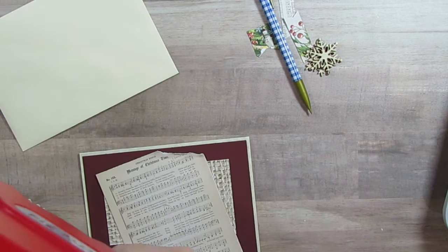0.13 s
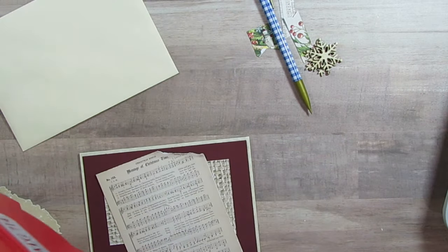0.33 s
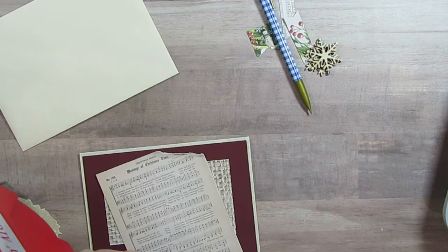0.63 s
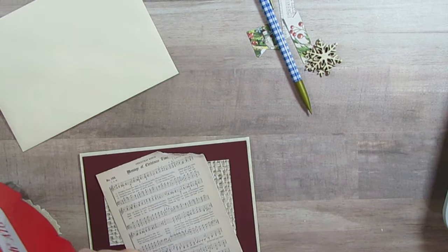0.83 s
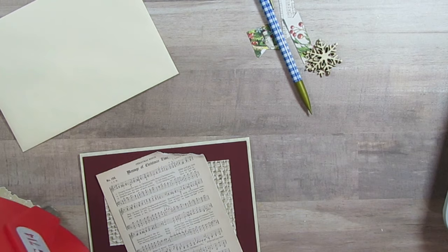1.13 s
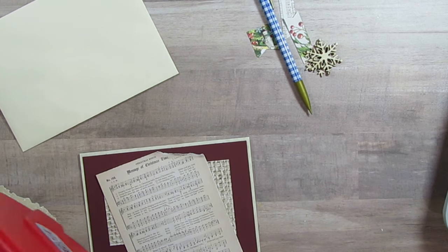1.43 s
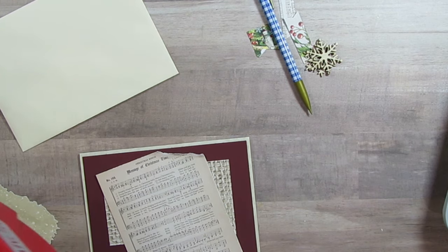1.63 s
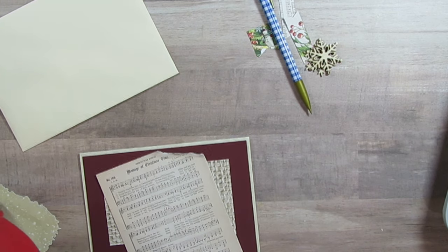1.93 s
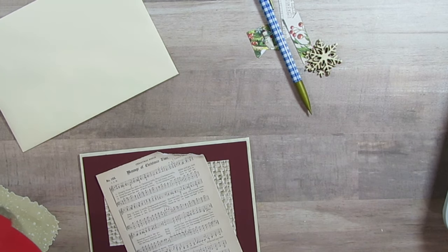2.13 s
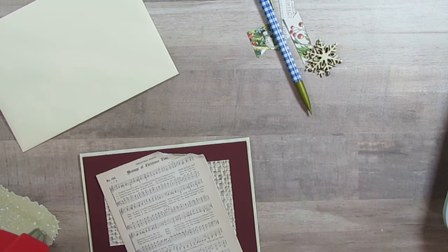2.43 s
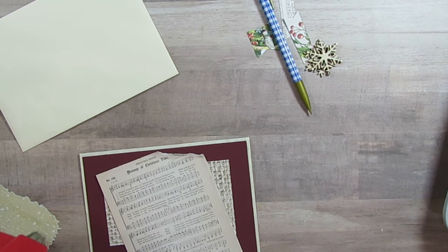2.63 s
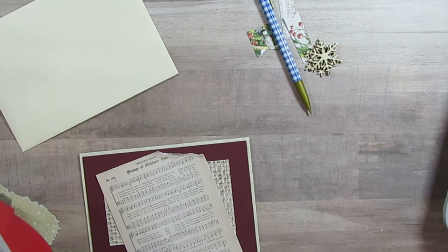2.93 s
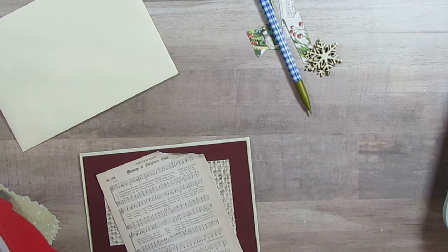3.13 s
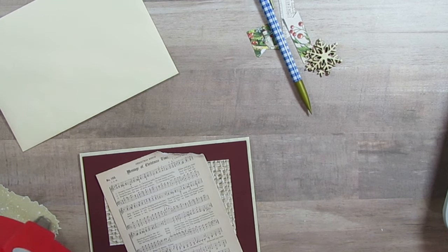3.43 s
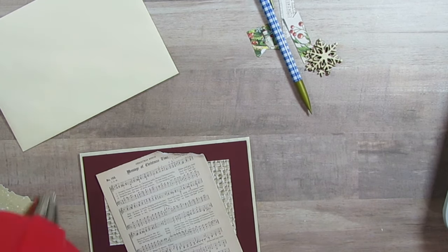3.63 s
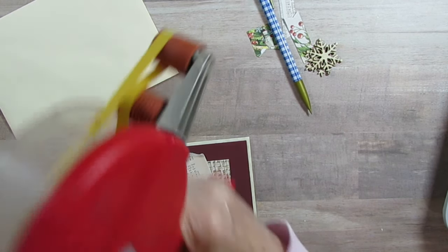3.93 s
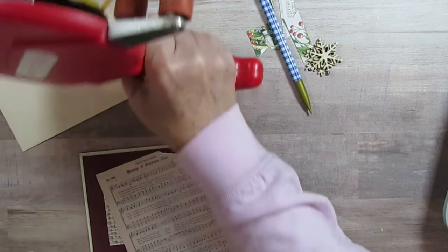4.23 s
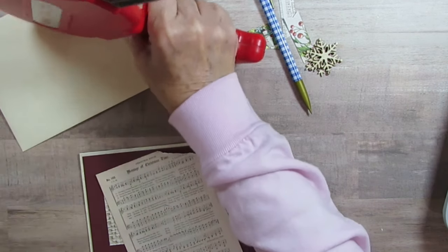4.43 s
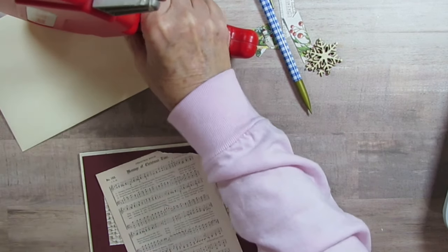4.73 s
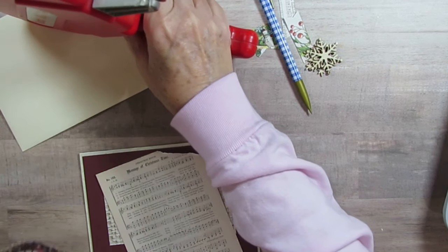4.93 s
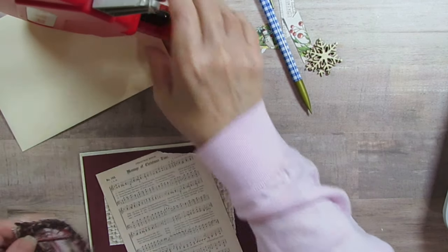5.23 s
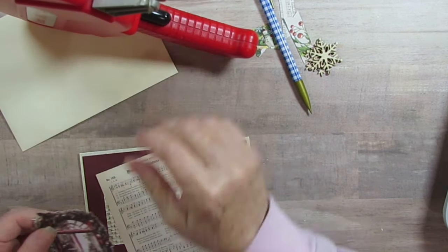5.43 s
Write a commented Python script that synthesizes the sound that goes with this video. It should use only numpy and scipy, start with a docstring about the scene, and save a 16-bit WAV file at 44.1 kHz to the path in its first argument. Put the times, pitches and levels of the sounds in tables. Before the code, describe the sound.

Close hollow plastic clatter and fine tape crackle in repeated bursts over a quiet humming room, ending in a loud set-down and one crisp crack.

```python
"""A plastic tape gun is pressed onto paper on a craft table, rolled along and lifted, three times, then laid down.
Filtered force noise drives its resonant housing, which rattles and ticks; tape and paper crackle as random grains.
Damped low modes of the table top sound at each thump; a three-lobed pulse is the trigger springing back.
Motor harmonics and shaped noise fill the quiet room behind; the recorder turns its gain down after loud peaks."""
import sys
import numpy as np
from scipy import signal
from scipy.fft import rfft, irfft, next_fast_len
from scipy.io import wavfile
from scipy.ndimage import uniform_filter1d, map_coordinates

SR = 44100
rng = np.random.default_rng(int(sys.argv[2]) if len(sys.argv) > 2 else 0)


def transcribe(signal):
    """Save signal, clipped to [-1, 1], as a 16-bit WAV file at the path in sys.argv[1]."""
    frames = np.atleast_2d(signal).T
    limited = np.clip(frames, -1, 1)
    pcm = np.round(limited * 32767).astype(np.int16)
    wavfile.write(sys.argv[1], SR, pcm)


N = 246807


def amp(db):
    """Decibel law: amplitude gain of a level in dB."""
    return 10 ** (np.asarray(db) / 20)


def unit(x):
    """Power normalization: scaled to rms 1."""
    return x / np.sqrt(np.mean(x ** 2) + 1e-20)


def peak(x):
    """Peak normalization: scaled to peak 1."""
    return x / np.max(np.abs(x))


def along(points, hz):
    """Logarithmic interpolation: (frequency [Hz], value) points read on a log axis."""
    f, v = np.transpose(points)
    return np.interp(np.log(hz + 1), np.log(f + 1), v)


def filtered(x, response):
    """Linear filtering: the spectrum of x times a complex response of frequency."""
    m = next_fast_len(x.shape[-1] + 8192)
    spectrum = rfft(x, m) * response(np.fft.rfftfreq(m, 1 / SR))
    return irfft(spectrum, m)[..., :x.shape[-1]]


# Spectrum of the air noise: (frequency [Hz], relative density [dB per Hz])
AIR_SPECTRUM = [(39, -7), (66, -8), (71, -23), (109, -23), (125, -13), (212, -12), (248, -7), (374, -15),
                (540, -11.5), (1050, -21.5), (1150, -22.5), (7130, -33.5), (13200, -39.5), (15500, -63)]
# Interchannel coherence of the air noise: (frequency [Hz], left-right likeness [-1 to 1])
AIR_COHERENCE = [(60, -1), (1650, -0.92), (4970, -0.11), (15000, -0.19)]


def air():
    """Partially coherent noise: room tone and microphone hiss, with a mid-side balance that sets the likeness."""
    def mid_side_gain(f):
        angle = np.arccos(np.clip(along(AIR_COHERENCE, f), -1, 1)) / 2
        return amp(along(AIR_SPECTRUM, f)) * [np.cos(angle), np.sin(angle)]

    mid, side = filtered(rng.standard_normal((2, N)), mid_side_gain)
    return amp(-44.5) * unit(np.array([mid + side, mid - side]))


# Spectrum of the low room rumble: (frequency [Hz], relative density [dB per Hz])
DRONE_SPECTRUM = [(55, -3), (80, 2), (120, 0), (160, 1), (200, -2.5), (280, -3), (400, -28), (600, -60)]


def drone():
    """Fully coherent noise: a soft low rumble, alike on both sides."""
    rumble = filtered(rng.standard_normal(N), lambda f: amp(along(DRONE_SPECTRUM, f)))
    return amp(-54.5) * unit(rumble)


MOTOR_HZ = 49.3
# Harmonics of the motor: (multiple of MOTOR_HZ, rms level before balance and waver [dB], left phase lead [rad])
MOTOR_ORDERS = [(1, -43.5, -0.4), (2, -55, 1.7), (3, -55, -2.5), (5, -60, 1.07), (7, -57, 3.5)]


def hum():
    """Harmonic series of a rotating source: steady motor orders, slightly unsteady in strength."""
    turn = 2 * np.pi * MOTOR_HZ * np.arange(N) / SR
    waver = map_coordinates(rng.standard_normal(40), [np.linspace(0, 39, N)])
    orders = 0
    for multiple, db, lead in MOTOR_ORDERS:
        phase = multiple * turn + np.array([[lead], [-lead]]) / 2
        orders = orders + amp(db) * np.sqrt(2) * np.sin(phase)
    return amp(0.13 * waver + [[-.7], [.7]]) * orders


# Reverberation time of the room: (frequency [Hz], t60 [s])
ROOM_T60 = [(100, 0.38), (700, 0.51), (3000, 0.39), (7000, 0.52), (12000, 0.2)]


def room(x):
    """Statistical reverberation: noise tails in which each frequency decays exponentially at its own speed."""
    out, step = np.zeros((2, N + 3 * SR)), SR // 4
    for start in range(0, N, step):  # a fresh noise tail every quarter second, so no single random colour lasts
        hz, t, z = signal.stft(rng.standard_normal((3, SR)), SR, nperseg=256)
        decay = amp(-60 * t / along(ROOM_T60, hz)[:, None])
        tail = signal.istft(z * decay, SR, nperseg=256)[1]
        tail = tail[:2] + 0.92 * tail[2]  # the third tail is common to both sides
        tail = tail / np.linalg.norm(tail[0])
        wet = signal.fftconvolve(x[None, start:start + step], tail, axes=1)
        out[:, start + 250:][:, :wet.shape[1]] += wet
    return out[:, :N]


# Low modes of the table top: (frequency [Hz], relative level [dB], t60 [s])
TABLE_MODES = [(60.6, 5.5, 0.13), (85, 3.5, 0.086), (131, -5.5, 0.3), (131.5, -1.5, 0.24),
               (206, -7.5, 0.084), (219, -3, 0.048), (331, -6, 0.39)]
# The gun meets the table top: (time [s], push peak [dB], contact time [ms],
# growth of the push per swing [dB], ringing peak over the push peak [dB])
TABLE_BLOWS = [(0.7585, -14.5, 4.2, 2, -1), (1.996, -13.5, 4.3, 2, 0), (3.085, -24.5, 4.85, 0.5, 0.5),
               (3.134, -32, 6.1, -20, 7), (4.5376, -4, 1.09, -18, -4), (4.668, -16.5, 2.8, -5.5, -12)]


def thumps():
    """Modal excitation: a soft push is heard directly and sets the table top's low modes ringing."""
    out, t = np.zeros(N + SR), np.arange(SR // 2) / SR
    modes = sum(amp(db - 60 * t / t60) * np.cos(2 * np.pi * hz * t) for hz, db, t60 in TABLE_MODES)
    for s, db, contact_ms, growth_db, ring_db in TABLE_BLOWS:
        swing = t / (contact_ms / 1000)
        growth = amp(growth_db * np.minimum(swing, 3))
        push = peak(np.where(swing < 3, np.sin(np.pi * swing) * growth, 0))  # the top dents and springs back
        ring = peak(signal.fftconvolve(modes, push)[:len(t)])
        out[round(s * SR):][:len(t)] += amp(db) * (push + amp(ring_db) * ring)
    return out[:N]


def contact(t, t60, noise):
    """Transient contact force: noise with a fast rise and an exponential decay."""
    return (1 - np.exp(-t / (0.072 * t60))) * amp(-60 * t / t60) * noise


# Spectrum of the dry cracks: (frequency [Hz], relative density [dB per Hz])
SNAP_SPECTRUM = [(2060, -23), (3500, -5.5), (4000, -7), (7090, -8), (8100, -11.5), (12300, -9),
                 (16000, -28.5)]
# Dry snaps of tape and plastic edges: (time [s], peak [dB], spectral tilt [dB per octave], force t60 [s])
EDGE_SNAPS = [(0.1334, -25.5, 4, 0.012), (0.3222, -41, 0, .019), (0.7614, -28, -1, 0.019),
              (0.7701, -22.5, -4, 0.014), (0.8264, -30, 2, 0.013), (0.8845, -21, 10, .015),
              (0.9274, -33, 5, 0.026), (1.0074, -33, 3, 0.017), (1.2411, -14.5, -4.5, 0.0083),
              (1.3473, -27, -1, 0.0065), (1.3814, -28, -7, 0.029), (1.8731, -26.5, -3, 0.0079),
              (2.0043, -15.5, 7, 0.015), (2.2124, -31.5, 13, .007), (2.2982, -24, -5.5, 0.016),
              (2.528, -39, 4, 0.018), (2.6494, -35, -4, 0.012), (2.6648, -18.5, -5, 0.0025),
              (2.6844, -26.5, -6.5, 0.013), (3.1074, -33, -7, .017), (3.2414, -32.5, 6, .017),
              (3.2934, -34.5, 10, .03), (3.3388, -36, 2, .025), (3.3962, -33.5, -2, 0.019),
              (3.4735, -39, 6, 0.0093), (3.496, -24.5, -5.5, 0.022), (3.5284, -30, -2, .013),
              (3.5964, -24, -1, .029), (3.7529, -31, -4.5, .015), (3.8871, -34, 11, .01),
              (3.9968, -17.5, -3, 0.013), (4.0532, -38, -5, 0.033), (4.4463, -35, -6, .013),
              (4.4862, -27, -8, 0.0085), (4.5376, -6.5, -4.5, 0.018), (5.1144, -43.5, 3, 0.033),
              (5.2804, -19.5, -1.5, 0.014)]


def snaps():
    """Non-resonant radiation: dry treble cracks without any ring."""
    out, t = np.zeros(N + SR), np.arange(SR // 12) / SR
    for s, db, tilt_db, t60 in EDGE_SNAPS:
        def colour(f):
            return amp(along(SNAP_SPECTRUM, f) + tilt_db * np.log2(f / 8000 + 0.022))

        force = contact(t, t60, rng.standard_normal(len(t)))
        out[round(s * SR):][:len(t)] += amp(db) * peak(filtered(force, colour))
    return out[:N]


# The trigger springs back: (time [s], main lobe peak [dB], centre frequency [Hz])
TRIGGER_RELEASES = [(5.2819, -4, 2020)]


def lobe(t, at, hz):
    """Ricker pulse: one crest between two troughs, centred on a time [s] and a frequency [Hz]."""
    squared = (np.pi * hz * (t - at)) ** 2
    return (1 - 2 * squared) * np.exp(-squared)


def release():
    """Impulsive radiation and reflection: a three-lobed crack, its sharp front and its bounce off the table top."""
    out, t = np.zeros(N), np.arange(-40, 120) / SR
    for s, db, hz in TRIGGER_RELEASES:
        front = -0.19 * lobe(t, -.00022, 3.3 * hz)
        bounce = 0.17 * lobe(t, 0.00056, 0.72 * hz)
        out[round(s * SR) - 40:][:len(t)] += amp(db) * (lobe(t, 0, hz) + front + bounce)
    return out


# Resonances of the plastic shell: (frequency [Hz], undamped width [Hz], relative level [dB])
HOUSING_MODES = [(318.6, 40, 5.5), (458, 156, 2.5), (610, 126, 3.5), (728, 51.6, 7), (842, 161, 1.5),
                 (1273, 322, -1.5), (1404, 155, 1.5), (1773, 244, -5.5), (2358, 150, -3), (2420, 300, -6.5),
                 (3310, 740, -13), (4460, 2000, -22.5), (5720, 320, -18.5)]
MODE_HZ = np.array([hz for hz, _, _ in HOUSING_MODES])
IS_HOLLOW = MODE_HZ < 950  # the low modes sound hollow


def housing(f, weight_db=0, damping=1):
    """Modal superposition: the shell's resonances, each with an extra weight; the plastic passes little treble."""
    weights = np.broadcast_to(weight_db, len(HOUSING_MODES))
    modes = 0
    for k, (hz, width, db) in enumerate(HOUSING_MODES):
        loss = 1j * f * width * damping
        modes = modes + (-1) ** k * amp(db + weights[k]) * loss / (hz * hz - f * f + loss)
    return modes / (1 + 1j * f / 4500 - (f / 4500) ** 2)


SPOT_FOCUS_DB = 14  # fall of the upper modes per squared octave from the spot struck
HOLLOW_FOCUS_DB = 40  # fall of the hollow modes per squared octave from the hollow pitch
TICK_LEFT_DB = -3.5  # left-right level
# Contacts of housing and trigger: (time [s], shell peak before left-right balance [dB],
# hollow knock over the shell [dB], spot struck [Hz], hollow pitch [Hz], force t60 [s])
HOUSING_TICKS = [(0.02, -29.5, -1.5, 1730, 726, 0.034), (0.0578, -25, 2.5, 950, 824, 0.023),
                 (0.0742, -11.5, -10, 1850, 766, 0.014), (0.1141, -16, -4, 912, 760, 0.017),
                 (0.1336, -24.5, -5, 1080, 300, 0.028), (0.1377, -13, -7, 1700, 680, 0.028),
                 (0.1514, -16.5, -7, 1770, 776, 0.026), (0.2423, -25, -2.5, 960, 724, 0.021),
                 (0.321, -26.5, -11, 1230, 736, 0.028), (0.396, -31.5, -13, 1210, 520, 0.02),
                 (0.7614, -16, -4.5, 2950, 460, 0.025), (0.7697, -11.5, -8, 1200, 420, 0.023),
                 (0.8097, -16, -25, 1440, 598, 0.031), (0.8264, -17, -23, 1020, 711, 0.026),
                 (0.9356, -21.5, -15, 1360, 608, 0.056), (0.9598, -19.5, -6, 1730, 614, 0.021),
                 (0.9715, -21, -12, 1330, 313, 0.051), (1.0077, -26, -4, 1240, 587, 0.022),
                 (1.0258, -28, -21, 1780, 608, 0.039), (1.2027, -36, -4, 1470, 575, 0.035),
                 (1.2406, -14.5, -10, 1570, 656, 0.016), (1.3917, -29, -11, 1210, 590, 0.032),
                 (2.0045, -21, -6, 1170, 335, 0.022), (2.0323, -27, 2, 1120, 613, 0.027),
                 (2.1944, -32, 2.5, 1330, 560, 0.023), (2.2874, -33, 4, 1260, 620, 0.012),
                 (2.2977, -19, -21, 1240, 630, 0.021), (2.318, -24, -6, 1750, 517, 0.011),
                 (2.3785, -32.5, 1.5, 1700, 505, 0.024), (2.4157, -19, -8.5, 1730, 670, 0.033),
                 (2.5355, -28.5, -18, 1140, 458, 0.019), (2.5528, -27.5, -18, 1220, 705, 0.023),
                 (3.0896, -27, -4, 970, 300, 0.036), (3.1074, -27, -9, 1240, 620, 0.025),
                 (3.1474, -26.5, -7, 1250, 595, 0.021), (3.1936, -25, -3.5, 1370, 610, 0.02),
                 (3.2271, -24, -5.5, 1800, 554, 0.021), (3.2715, -26.5, -4.5, 1730, 565, 0.018),
                 (3.3385, -27, -17, 1740, 716, 0.033), (3.3961, -22, -12, 1070, 624, 0.029),
                 (3.4733, -25.5, -11, 1400, 324, 0.022), (3.496, -25.5, -22, 1280, 716, 0.035),
                 (3.5285, -19, -13.5, 1530, 357, 0.022), (3.5464, -18, -8, 1220, 748, 0.014),
                 (3.5964, -29, -3, 1220, 426, 0.048), (3.7526, -32, -11, 1250, 770, 0.036),
                 (3.9144, -36, -3.5, 1820, 700, 0.027), (3.9544, -40, 1, 1060, 721, 0.013),
                 (3.9969, -18, -12.5, 3350, 770, 0.023), (4.0532, -34.5, 6, 1250, 750, 0.042),
                 (4.268, -51, 11, 1300, 330, 0.055), (4.362, -53.5, 13.5, 1300, 326, 0.04),
                 (4.405, -52, 10.5, 1300, 330, 0.027), (4.4463, -41, -3, 1470, 560, 0.02),
                 (4.4865, -34.5, -4, 993, 514, 0.011), (4.5376, -6.5, -4.5, 2490, 700, 0.029),
                 (4.6714, -26.5, 11, 902, 810, 0.016), (5.114, -42, -25, 1790, 301, 0.02),
                 (5.2805, -22.5, -12.5, 1540, 510, 0.035)]


def ticks():
    """Point excitation of modes: each contact is a short burst that rings the shell near the spot struck."""
    out, t = np.zeros(N + SR), np.arange(SR // 12) / SR
    for s, db, knock_db, spot_hz, knock_hz, t60 in HOUSING_TICKS:
        force = contact(t, t60, rng.standard_normal(len(t)))
        force[40] = (0.04 / t60) ** 2  # the briefer the contact, the more it is one clean blow
        damping = 1 + 0.012 / t60  # and the more the hand stills the shell
        near_spot = np.where(IS_HOLLOW, -60, -SPOT_FOCUS_DB * np.log2(MODE_HZ / spot_hz) ** 2)
        near_pitch = np.where(IS_HOLLOW, -HOLLOW_FOCUS_DB * np.log2(MODE_HZ / knock_hz) ** 2, -60)
        shell = peak(filtered(force, lambda f: housing(f, near_spot, damping)))
        hollow = peak(filtered(force, lambda f: housing(f, near_pitch)))
        out[round(s * SR):][:len(t)] += amp(db) * (shell + amp(knock_db) * hollow)
    return out[:N] * amp(np.array([[TICK_LEFT_DB], [-TICK_LEFT_DB]]) / 2)


def grains(rate, spread_db, bed):
    """Shot noise: random impulses (rate per second) of very unequal size over a smooth bed of noise."""
    size = amp(spread_db * np.minimum(rng.exponential(size=N), 4))
    hit = (rng.random(N) < rate / SR) * size
    return unit(hit * rng.standard_normal(N)) + bed * rng.standard_normal(N)


def bursts(rows):
    """Exponential growth and decay: power of each burst, climbing and falling steadily in dB."""
    now, powers = np.arange(N) / SR, []
    for s, db, rise, fall, *_ in rows:
        climb = 20 * (now - s) / rise  # 20 dB during the rise
        powers.append(amp(db + np.minimum(climb, fall * (s - now))) ** 2)
    return np.array(powers)


# Levels: the gun in the hand never quite rests; table rumble under the rattle
IDLE_RATTLE_DB, IDLE_CRACKLE_DB, RUMBLE_DB = -52.5, -66.5, -10
# Roller and spool rattle the shell: (time of the height [s], level [dB], rise [s], fall [dB per s],
# hollow pitch [Hz], hollow part over the rest [dB])
RATTLE_BURSTS = [(0.078, -31, 0.051, 320, 750, 1), (0.148, -25, 0.088, 300, 750, 0.5),
                 (0.19, -41, .03, 34, 710, 1.5), (0.78, -30, 0.022, 150, 400, 4.5),
                 (0.8, -26.5, 0.034, 52, 700, -1.5), (0.978, -39, 0.12, 63, 604, 2.5),
                 (1.25, -36.5, 0.013, 134, 700, 3), (2.021, -28.5, .025, 122, 533, 2),
                 (2.2, -36.5, 0.05, 68, 610, 3), (2.292, -36, .02, 66, 585, 0),
                 (2.49, -53, 0.1, 100, 600, -1), (2.536, -41, .015, 88, 600, -0.5),
                 (3.1, -37.5, .02, 51, 610, 4.5), (3.25, -35, 0.14, 19, 610, 0),
                 (3.536, -44, 0.15, 58, 607, 0), (3.812, -50, 0.13, 150, 730, 3),
                 (3.904, -44, .03, 65, 725, 0.5), (4.002, -52, .015, 66, 736, 2.5),
                 (4.3, -56, 0.18, 65, 405, 10.5), (4.51, -46, 0.16, 200, 450, 5),
                 (4.55, -22, .02, 200, 450, 0), (4.569, -22.5, 0.035, 99, 786, 3),
                 (4.69, -40.5, .03, 99, 760, 5), (5.3, -41.5, 0.041, 300, 524, 2),
                 (5.33, -51, .02, 100, 520, -3)]
# Spectrum of tape and paper: (frequency [Hz], relative density [dB per Hz])
CRACKLE_SPECTRUM = [(1470, -23), (2500, -3.5), (4020, -2.5), (4580, -3), (12600, -7.5), (14600, -15),
                    (16000, -59)]
# Tape and paper crackle: (time of the height [s], level [dB], rise [s], fall [dB per s])
CRACKLE_BURSTS = [(0.078, -49.5, .05, 450), (0.148, -52, .1, 200), (0.19, -60, .03, 40),
                  (0.78, -53, .03, 280), (0.978, -52, .1, 58), (1.235, -51.5, 0.013, 70),
                  (1.35, -44.5, 0.018, 140), (1.9, -61, 0.33, 40), (2.02, -54, .04, 87),
                  (2.285, -50, 0.19, 64), (2.418, -56, .02, 300), (2.67, -48, .05, 102),
                  (3.1, -56, .025, 334), (3.26, -49.5, 0.049, 40), (3.385, -51, .3, 170),
                  (3.536, -57, 0.14, 320), (3.586, -40.5, .022, 240), (3.89, -56.5, 0.25, 38),
                  (4.005, -46, 0.022, 22), (4.2, -61, .4, 47), (4.5, -56, 0.31, 200),
                  (4.561, -35.5, .04, 177), (5.27, -48, 0.044, 700), (5.328, -60, .05, 27)]


def stroke():
    """Random vibration: the roller rumbles in the table and rattles the shell, the tape lets go in fine crackles."""
    def table_top(f):
        return sum(amp(db) * 1j * f * 30 / (hz * hz - f * f + 1j * f * 30)
                   for hz, db, _ in TABLE_MODES if hz > 110)

    power = bursts(RATTLE_BURSTS)
    rumble = np.sqrt(power.sum(0)) * unit(filtered(rng.standard_normal(N), table_top))

    force = grains(rate=700, spread_db=3, bed=0.94)
    scale = np.std(filtered(force, housing))
    idle = amp(IDLE_RATTLE_DB) ** 2
    upper = filtered(force, lambda f: housing(f, np.where(IS_HOLLOW, -99, 0)))
    rattle = np.sqrt(power.sum(0) + idle) * upper
    for hz in MODE_HZ[IS_HOLLOW]:  # the grip decides which hollow modes speak
        weight = [amp(db - HOLLOW_FOCUS_DB * np.log2(hz / pitch) ** 2) ** 2
                  for *_, pitch, db in RATTLE_BURSTS]
        mode = filtered(force, lambda f: housing(f, np.where(MODE_HZ == hz, 0, -99)))
        rattle = rattle + np.sqrt(weight @ power + idle) * mode

    tearing = grains(rate=4100, spread_db=6.5, bed=1.3)
    crackle = unit(filtered(tearing, lambda f: amp(along(CRACKLE_SPECTRUM, f))))
    crackle_level = np.sqrt(bursts(CRACKLE_BURSTS).sum(0) + amp(IDLE_CRACKLE_DB) ** 2)
    return amp(RUMBLE_DB) * rumble + rattle / scale + crackle_level * crackle


# Phase between the two microphone ports: (frequency [Hz], left phase lead [rad])
PORT_PHASE = [(3000, 0), (5500, -.25), (7500, -.45), (9500, -.7), (12500, -1.3), (16000, -1.8)]


def scene():
    """Superposition of direct, reflected and reverberant sound; two microphone ports shift the treble in phase."""
    def near_field(f):
        wall = 1 + 0.13 * np.exp(-2j * np.pi * f * 0.0065)  # a near wall, 6.5 ms later
        return wall * np.exp(.5j * np.array([[1], [-1]]) * along(PORT_PHASE, f))

    table = thumps()
    gun = ticks() + snaps() + (release() + stroke()) * amp([[-.6], [.6]])
    close = filtered(gun + table, near_field)
    reverberant = room(amp(-8.5) * gun.mean(0) + amp(-6.0) * table)
    return close + reverberant + hum() + air() + drone()


TOP_HZ = 16478  # nothing passes above
# Narrow dips in the response: (centre [Hz], width [Hz], depth [0-1])
RESPONSE_DIPS = [(3900, 130, .85), (7860, 90, .9)]


def record(dry):
    """Gain control and band limiting: gain sinks after loud peaks and creeps back; the response has narrow dips."""
    over_db = np.maximum(20 * np.log10(np.abs(dry).max(0) + 1e-9) + 4, 0)  # above -4 dB
    slope = 14 * np.arange(N) / SR  # recovery, 14 dB per s
    held_db = np.maximum.accumulate(np.minimum(over_db, 6) + slope)
    cut_db = np.maximum(held_db - slope, 0)
    cut_db = uniform_filter1d(np.pad(cut_db, (440, 0))[:N], size=880)

    def response(f):
        dips = np.prod([1 - depth * np.exp(-((f - hz) / width) ** 2)
                        for hz, width, depth in RESPONSE_DIPS], axis=0)
        low_cut = 1 - 1j * 36 / (f + 1) - (40 / (f + 1)) ** 2
        high_cut = np.sqrt(1 + (f / 15000) ** 24)
        return dips * (f < TOP_HZ) / low_cut / high_cut

    return np.clip(filtered(dry * amp(-cut_db), response), -1, 1)


dry = scene()
out = record(dry)
transcribe(out)
```